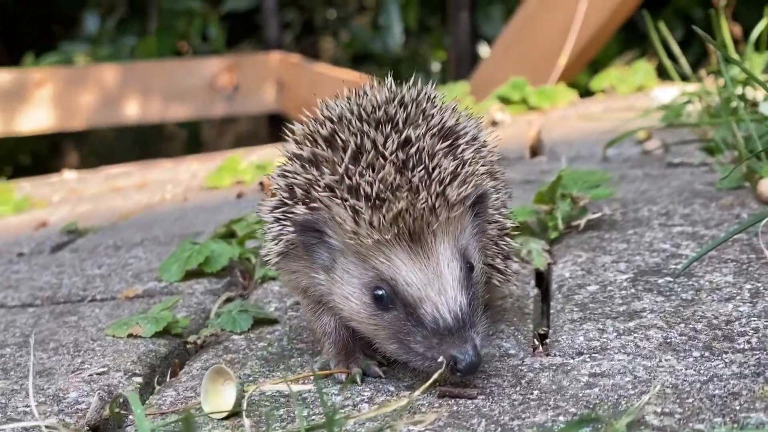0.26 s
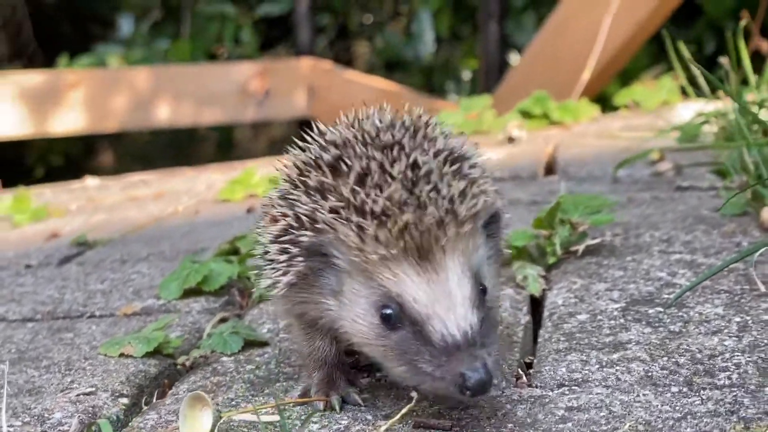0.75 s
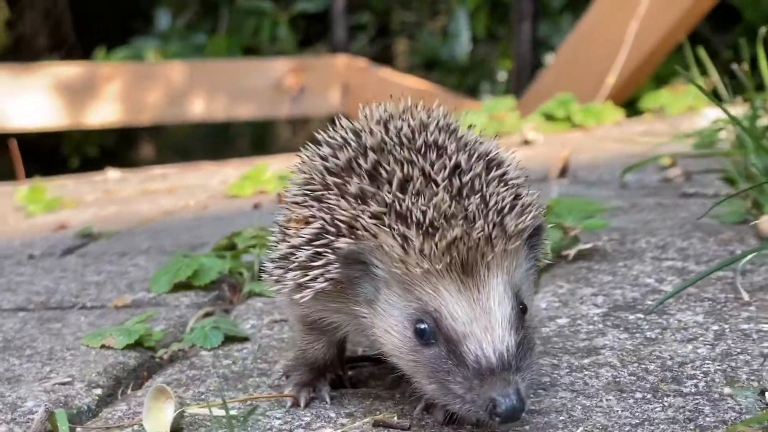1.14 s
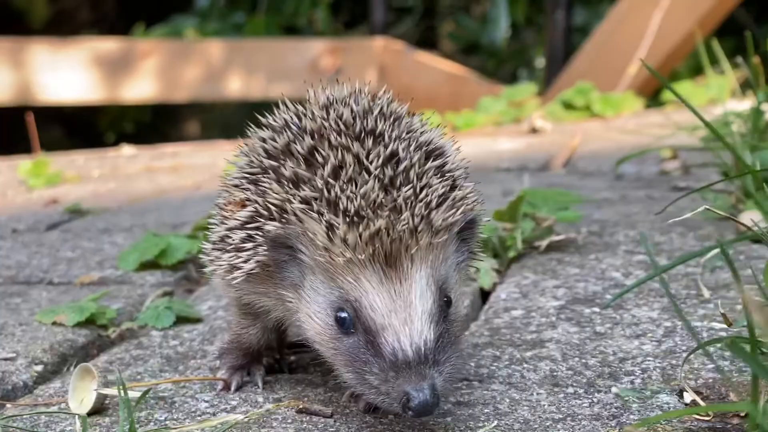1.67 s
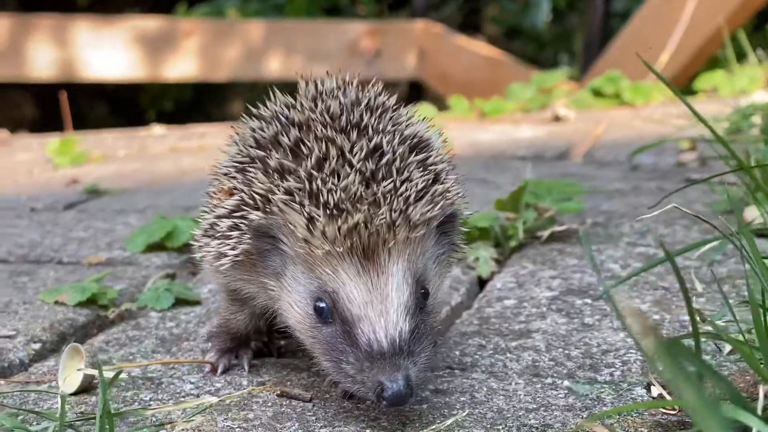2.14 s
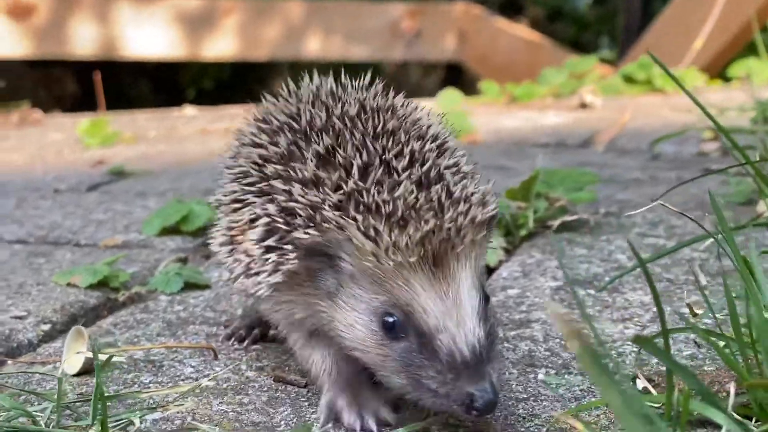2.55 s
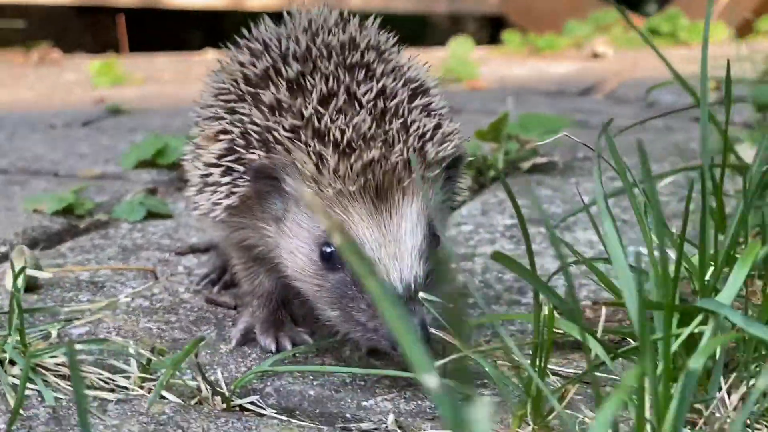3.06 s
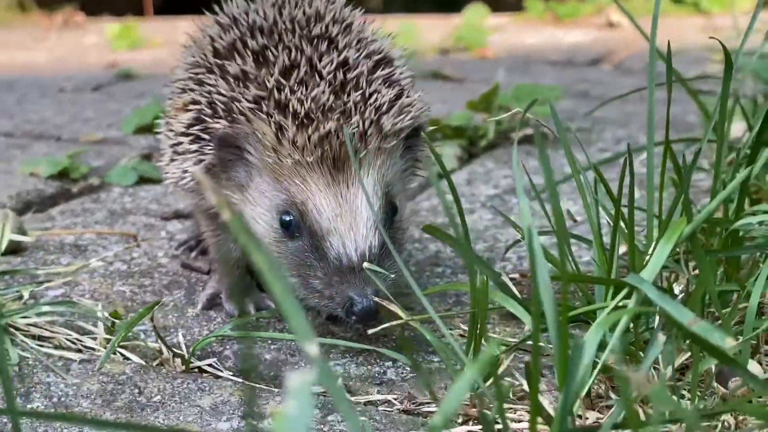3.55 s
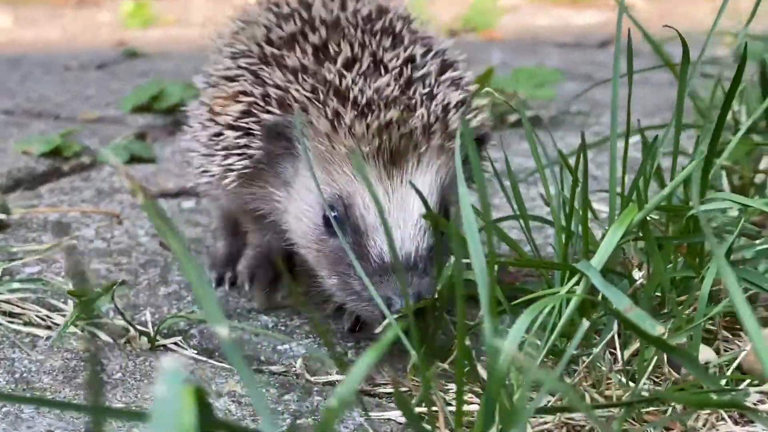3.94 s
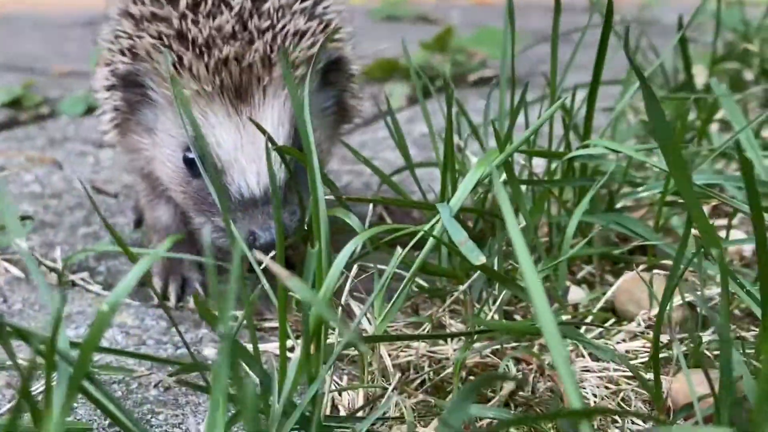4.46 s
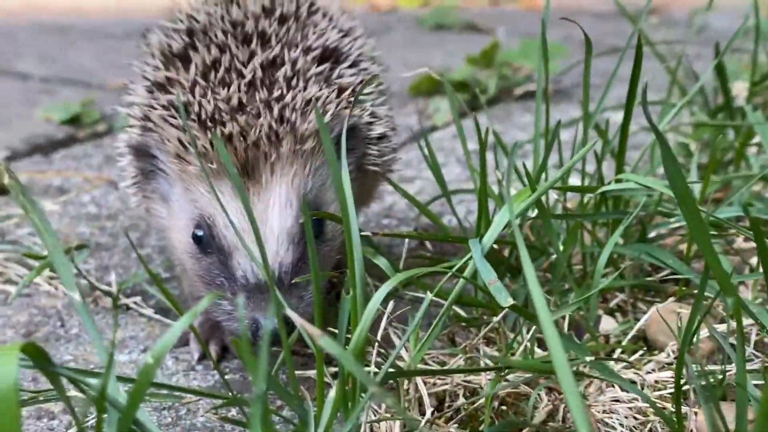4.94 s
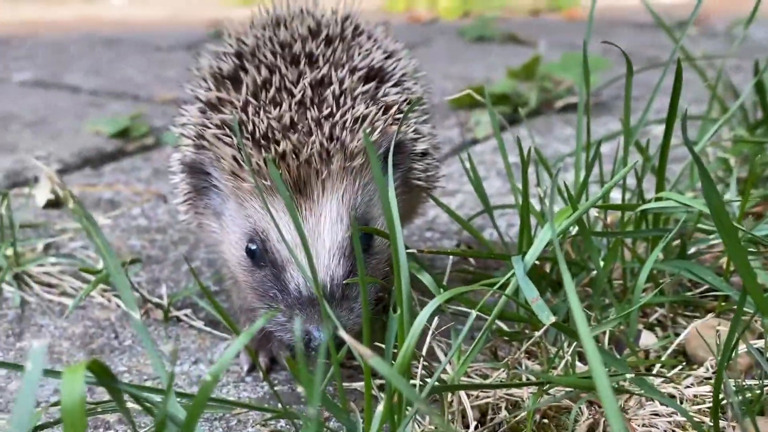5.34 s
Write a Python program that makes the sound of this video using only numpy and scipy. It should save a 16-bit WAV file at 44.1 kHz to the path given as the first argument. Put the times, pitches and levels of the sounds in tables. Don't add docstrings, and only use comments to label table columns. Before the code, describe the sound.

A hedgehog sniffs close to the microphone in quick puffs and soft draws, while a low machine drone slowly nears and dry grass ticks.

```python
import sys
import numpy as np
from scipy import signal
from scipy.fft import rfft, irfft, next_fast_len
from scipy.io import wavfile
from scipy.ndimage import uniform_filter1d, map_coordinates

SR = 44100
rng = np.random.default_rng(int(sys.argv[2]) if len(sys.argv) > 2 else 0)


def pcm_store(signal):
    levels = np.round(np.clip(np.atleast_2d(signal), -1, 1) * 32767)
    wavfile.write(sys.argv[1], SR, levels.astype(np.int16).T)


def decibels_to_gain(level_db):
    exponent = np.asarray(level_db, float) / 20
    return 10 ** exponent


N = 246958

# pitch_hz, density_db (per Hz)
RUMBLE_COLOUR = [(12, -71), (20, -41), (54, 0), (113, 1), (140, 1.5), (159, -13), (173, -24.5), (260, -17),
                 (340, -48.5), (570, -120)]
ROAR_COLOUR = [(94, -28.5), (160, -4.5), (195, -8), (242, -12.5), (301, -14.5), (383, -15), (594, -25),
               (782, -39.5), (2500, -64), (3250, -91), (5500, -120)]
HISS_COLOUR = [(700, -23), (1200, 0.5), (1900, -4), (3400, -8), (7600, -9.5), (8400, -13.5), (10500, -13),
               (12300, -16.5), (12900, -28), (15800, -31)]
SWISH_COLOUR = [(300, -43), (550, -2.5), (800, -0.5), (1100, -9.5), (2000, -31.5), (4000, -120)]
# pitch_hz, likeness (0 to 1)
LIKENESS = [(60, 1), (130, 1), (290, 0.77), (640, 0.1), (1410, 0.23), (3100, 1), (6820, 0.32),
            (15000, 0.48)]
# time_s, level_db
TRAFFIC = [(0, -2.5), (.25, 5.5), (.9, -1), (1.2, -1.5), (2.3, -0.5), (3.0, -1), (3.4, 2), (3.8, -2),
           (4.15, 5), (4.5, 1.5), (5.15, 2.5), (5.6, -2)]
# time_s, level_db
BREEZE = [
    (0, 1),
    (.6, 2),
    (1.1, 0),
    (2.2, -0.4),
    (2.7, 0.5),
    (3.4, -1),
    (4.4, -0.5),
    (5.0, -0.3),
    (5.3, 1),
    (5.6, 1),
]
# time_s, firing_db, labour_db (lifts order 2), clear_path_db (lifts what lies above)
DRONE = [(0, -59.5, 2, -6.5), (.34, -62.5, -2.5, -4.5), (.61, -55.5, 1.5, -2), (1.29, -58.5, -6, -3.5),
         (1.62, -56, 4.5, -5.5), (2.1, -55.5, 2.5, -7), (2.33, -56, -12.5, -3), (2.7, -53, 0, -2.5),
         (3.04, -49.5, 0.5, -9), (3.3, -48, 3, 1), (3.55, -49, 4, 2.5), (3.7, -49, .5, -5),
         (4.05, -47.5, .5, 1.5), (4.33, -47, 0.5, 3.5), (4.6, -46, 2.5, 10.5), (4.93, -48.5, 1, 12),
         (5.3, -51, -4, 8.5), (5.6, -47, 3, 10.5)]
# start_s, peak_db, pitch_hz, left_over_right_db
SNAPS = [(.033, -76, 11000, 0), (.074, -67.5, 12700, -17), (0.103, -65, 11500, 2), (.107, -64.5, 12500, -4),
         (.161, -78, 10000, 1), (.303, -72.5, 11300, -7), (.318, -80, 11300, -3), (.374, -79, 11000, 0),
         (.395, -87, 9000, 2), (.416, -78, 8500, 0), (.490, -80, 10800, -3), (.540, -81.5, 6600, 14),
         (1.105, -81, 7000, -2), (2.372, -72, 11000, 0), (5.46, -83, 3550, -4)]
# start_s, length_s, level_db, pitch_hz
STROKES = [(0, 0.064, -87.5, 10800), (0, 0.082, -86, 14800), (0.072, 0.045, -88, 14800),
           (0.124, 0.047, -92.5, 14300), (0.262, .06, -91.5, 15000), (0.529, 0.044, -100, 14400),
           (1.119, .04, -100, 10000), (2.335, 0.053, -97, 13900), (2.517, 0.044, -84, 1900),
           (2.69, .06, -87, 1950), (2.842, .05, -85.5, 1900), (4.06, .03, -89.5, 1230),
           (2.832, 0.023, -83.5, 14800), (2.834, 0.026, -89.5, 11000), (3.751, 0.12, -90, 14800),
           (3.775, .03, -89, 10900), (3.899, 0.033, -84, 14300), (5.138, 0.088, -103.5, 10800),
           (5.398, .05, -104, 10500), (5.319, 0.037, -93, 1790), (5.442, 0.037, -99, 1500),
           (5.502, .035, -82, 1180), (5.533, 0.062, -85, 1590)]
# start_s, peak_db, hold_s, mouth_open_db
PUFFS = [(.6399, -55, 0.021, -4), (.7844, -52, 0.023, -2), (0.9287, -54, 0.007, -1.5),
         (1.056, -57, 0.0076, -6), (1.208, -69, .0071, -18), (1.362, -71.5, .0052, -10),
         (1.723, -61, 0.0041, -4), (1.882, -64.5, 0.0072, -3), (2.068, -64.5, .0041, -9.5),
         (2.243, -69.5, .0028, -10), (2.375, -58.5, 0.014, -8), (2.5103, -60.5, 0.017, -5),
         (2.6462, -60, 0.017, 3.5), (2.776, -57.5, 0.025, 0), (2.9397, -68, 0.029, 6.5),
         (3.0932, -72, 0.0074, -16), (3.433, -70.5, 0.0048, -6), (3.7553, -58.5, 0.023, 0),
         (3.907, -55.5, 0.021, 0), (4.054, -67.5, 0.0084, 3), (4.191, -78, 0.0085, -12.5),
         (4.489, -61, 0.0096, 1), (4.621, -61.5, 0.01, 4), (4.747, -60.5, 0.0032, 6.5),
         (4.8683, -69.5, 0.01, -1)]
# start_s, first_db, last_db, nostril_flare_db
DRAWS = [(.584, -80, -62.5, -8.5), (.688, -74, -68, -13), (0.837, -65, -74, -19), (1.001, -74, -80, -26),
         (1.177, -79, -92, -14), (2.319, -86, -64, -2.5), (2.424, -73.5, -74, -14), (2.562, -70, -75, -8),
         (2.691, -73, -79.5, -10), (2.831, -68, -86, -5), (3.616, -82.5, -125, -8),
         (3.665, -71, -71.5, -10.5), (3.804, -68, -83.5, -17), (3.96, -84, -77.5, -23),
         (4.115, -79, -130, -11), (4.457, -84, -74, -26), (4.532, -85.5, -73, -10.5),
         (4.672, -72, -83.5, -17), (4.817, -75.5, -90, -17)]
# time_s, level_db
FACING = [
    (.65, -8.5),
    (1.3, -10.5),
    (1.75, -4.5),
    (2.5, -2),
    (3.0, -4),
    (3.5, -4.5),
    (4.0, -15),
    (4.9, -21.5),
]
# pitch_hz, width_hz, level_db
NOSE = [(2620, 400, -8), (3030, 500, 0), (3500, 450, -12)]
THROAT = [(470, 250, 4), (660, 320, 0.5), (930, 160, -2.5), (1180, 255, -1), (1382, 180, -4.5),
          (2140, 370, -29.5)]
NOSTRIL = [(4880, 1100, 4), (5780, 2000, 1.5), (6600, 1200, 5)]
JET = [(9750, 2900, -4.5), (12000, 1600, -6.5), (14800, 1200, -10)]
SINUS = [(3490, 1700, 1), (4550, 840, -8)]
# pitch_hz, level_db; then pitch_hz, lead_rad
PORT_LEVEL = [(60, 1), (110, -3.5), (200, 0), (380, -2.5), (700, 0), (1290, 0.5), (2380, -1), (4400, 0.5),
              (8120, -0.5), (15000, 1)]
PORT_LEAD = [(60, .2), (150, .35), (430, 1.2), (900, .4), (1550, -.2), (3270, .6), (6000, -.2), (7800, .1),
             (8400, 2.1), (10400, .2), (11600, -.2), (12600, -2.4), (15500, -4)]

FIRING_HZ = 146.7
NEAR_DB = -52
RUMBLE_DB, RUMBLE_GROWS, SWELL_DB = -55.5, 0.3, 1.2
ROAR_DB, ROAR_GROWS, ROAR_CLEARS = -60, 0.28, 0.2
HISS_DB, SWISH_DB, SWISH_GROWS = -88, -84.5, 3
SECOND_DB, THIRD_DB, THIRD_BREAKS_DB = -65.5, -73, 3
FAN_DB, FAN_GROWS, FAN_CLEARS, FADING_DB = -79, 0.89, 0.49, 2.5
FALL_T60_S, FALL_PER_HOLD = 0.067, 0.53
SHUT_S = 0.0039
DRAW_THROAT_DB, THROAT_SHADE = -4, 0.17
NOSTRIL_DB, NOSTRIL_FOLLOWS, NOSTRIL_PER_S = -9, 0.67, 96


def unit(x):
    return x / np.sqrt(np.mean(x ** 2) + 1e-20)


def along(points, hz):
    f, v = np.transpose(points)
    return np.interp(np.log(hz + 1), np.log(f + 1), v)


def curves(rows):
    s, *columns = np.transpose(rows)
    return [np.interp(np.arange(N) / SR, s, column) for column in columns]


def wobble(rate):
    knots = rng.standard_normal(int(N * rate / SR) + 4)
    return map_coordinates(knots, [np.arange(N) * rate / SR])


def filtered(x, response):
    size, lead = next_fast_len(N + SR // 2), SR // 4
    widths = [(0, 0)] * (x.ndim - 1) + [(lead, size - N - lead)]
    spectrum = rfft(np.pad(x, widths, mode="reflect"))
    return irfft(spectrum * response(np.fft.rfftfreq(size, 1 / SR)), size)[..., lead:lead + N]


def cavity(modes):
    def response(f):
        power = 0
        for centre, width, db in modes:
            damping = (f * width) ** 2
            power = power + decibels_to_gain(2 * db) * (damping / ((centre ** 2 - f * f) ** 2 + damping)) ** 2
        return np.sqrt(power / np.mean(power))
    return response


def rush(colour, patchy_db):
    grid = signal.stft(rng.standard_normal((2, N)), nperseg=512)[2]
    patches = uniform_filter1d(rng.standard_normal(grid.shape[1:]), 6, 0)
    patches = unit(uniform_filter1d(patches, 14, 1))
    pair = signal.istft(grid * decibels_to_gain(patchy_db * patches), nperseg=512)[1][:, :N]

    def mid_side(hz):
        angle = np.arccos(np.clip(along(LIKENESS, hz), -1, 1)) / 2
        return decibels_to_gain(along(colour, hz)) * [np.cos(angle), np.sin(angle)]

    mid, side = filtered(pair, mid_side)
    return unit(np.array([mid + side, mid - side]))


def town_rumble():
    near_db = curves(DRONE)[0] - NEAR_DB
    traffic_db, = curves(TRAFFIC)
    level_db = RUMBLE_DB + RUMBLE_GROWS * near_db + traffic_db + SWELL_DB * wobble(6)
    return decibels_to_gain(level_db) * rush(RUMBLE_COLOUR, patchy_db=-0.97)


def breeze():
    breeze_db, = curves(BREEZE)
    hiss = decibels_to_gain(HISS_DB + breeze_db) * rush(HISS_COLOUR, patchy_db=0.25)
    swish = decibels_to_gain(SWISH_DB + SWISH_GROWS * breeze_db) * rush(SWISH_COLOUR, patchy_db=2.5)
    return hiss + swish


def machine_roar():
    firing_db, _, clear_db = curves(DRONE)
    level_db = ROAR_DB + ROAR_GROWS * (firing_db - NEAR_DB) + ROAR_CLEARS * clear_db + 0.4 * wobble(4)
    return decibels_to_gain(level_db) * rush(ROAR_COLOUR, patchy_db=2.0)


def machine_drone():
    firing_db, labour_db, clear_db = curves(DRONE)
    near_db = firing_db - NEAR_DB
    second_db = SECOND_DB + labour_db
    third_db = THIRD_DB - 3.5 + clear_db + THIRD_BREAKS_DB * wobble(12)
    fourth_db = third_db - 17.5 + 4.1 * wobble(3)
    fan_db = FAN_DB + FAN_GROWS * near_db + FAN_CLEARS * clear_db + FADING_DB * wobble(3.5)
    # order, level_db, left-right phase spread_rad
    lines = [(1, firing_db, 0.04), (2, second_db, 0.3), (3, third_db, 0.6), (4, fourth_db, 0.6),
             (7 / 3, fan_db, 0.5)]
    turn = 2 * np.pi * FIRING_HZ * np.arange(N) / SR
    out = np.zeros((2, N))
    for order, db, spread in lines:
        drift = 0.34 * order * wobble(4)
        apart = spread * wobble(0.88) * np.array([[0.5], [-0.5]])
        level = np.sqrt(2) * decibels_to_gain(db + 0.23 * order * wobble(9))
        out += level * np.sin(order * turn + drift + apart)
    misfire = unit(filtered(rng.standard_normal(N), cavity([(FIRING_HZ / 2, 22, 0)])))
    return out + decibels_to_gain(-48 + 0.19 * firing_db) * misfire


def grass():
    out, t = np.zeros((2, N + SR)), np.arange(SR // 125) / SR
    snaps = [(s, db + 18.5, hz, pan_db, 9) for s, db, hz, pan_db in SNAPS]
    for s, length, db, hz in STROKES:
        when, size, pitch, side = rng.random((4, 120))
        times = s + length * when
        levels_db = db + 6.5 - 4.0 * np.log(size + 0.02)
        pitches = hz + 1200 * (pitch - 0.5)
        ring_cycles = np.full(120, 7 + hz / 450)
        snaps += zip(times, levels_db, pitches, 12 * side - 6, ring_cycles)
    for s, db, hz, pan_db, cycles in snaps:
        phase = 0.64 * rng.uniform(0, 2 * np.pi, (2, 1))
        envelope = (1 - np.exp(-t * hz)) * decibels_to_gain(-60 * t * hz / cycles)
        snap = envelope * np.sin(2 * np.pi * hz * t + phase)
        pan = decibels_to_gain([[pan_db / 2], [-pan_db / 2]])
        out[:, round(s * SR):][:, :len(t)] += decibels_to_gain(db) * pan * snap
    return out[:, :N]


def puff(t, db, hold, open_db):
    t60 = FALL_T60_S + FALL_PER_HOLD * hold
    fall_db = -90 * np.minimum(t, hold) - 60 * np.clip(t - hold, 0, None) / t60
    shape = (1 - np.exp(-t / 0.0013)) ** 2 * decibels_to_gain(fall_db)
    nostril_db = NOSTRIL_DB + NOSTRIL_FOLLOWS * open_db + NOSTRIL_PER_S * hold
    jet_db = nostril_db - 8.0
    balance = decibels_to_gain([[0], [open_db + 3.5], [nostril_db], [jet_db]])
    return decibels_to_gain(db - 6.0) * balance * shape ** np.array([[1], [0.8], [1.05], [1.15]])


def draw(t, length, first_db, last_db, flare_db, throat_db):
    edges = np.clip(t / 0.016, 0, 1) * np.clip((length - t) / 0.011, 0, 1)
    level = decibels_to_gain(first_db + (last_db - first_db) * np.clip(t / length, 0, 1))
    return level * edges * decibels_to_gain([[0], [throat_db], [flare_db], [flare_db - 17.0]])


def airflow():
    flow, t = np.zeros((4, N + SR)), np.arange(SR // 4) / SR
    facing_db, = curves(FACING)
    starts = np.transpose(PUFFS)[0]
    for s, db, hold, open_db in PUFFS:
        flow[:, round((s - 0.002) * SR):][:, :len(t)] += puff(t, db, hold, open_db)
    for s, first_db, last_db, flare_db in DRAWS:
        length = starts[starts > s].min() - s - SHUT_S
        throat_db = DRAW_THROAT_DB + THROAT_SHADE * facing_db[round(s * SR)]
        breath = draw(t, length, first_db, last_db, flare_db, throat_db)
        flow[:, round(s * SR):][:, :len(t)] += breath
    flow = flow[:, :N]
    return np.vstack([flow, flow[0] * decibels_to_gain(facing_db)])


def stone_echo(nose):
    t = np.arange(SR // 8) / SR
    scatter = rng.standard_normal((2, len(t))) * decibels_to_gain(-60 * t / 0.15)
    scatter = scatter / np.linalg.norm(scatter[0])
    return signal.fftconvolve(nose[None], scatter, axes=1)[:, :N]


def sniffing():
    flutter_db = 1.1 * wobble(220) + 2.27 * np.array([wobble(180) for _ in range(5)])
    turbulence = airflow() * unit(decibels_to_gain(flutter_db) * rng.standard_normal((5, N)))
    cavities = (NOSE, THROAT, NOSTRIL, JET, SINUS)
    nose = sum(filtered(air, cavity(modes)) for air, modes in zip(turbulence, cavities))
    return nose + decibels_to_gain(-13.0) * stone_echo(nose)


def scene():
    far = town_rumble() + breeze() + machine_roar() + machine_drone()
    return far + grass() + sniffing()


def top_cut(x):
    return signal.sosfilt(signal.butter(12, 15920, fs=SR, output="sos"), x)


def record(dry):
    half = np.array([[0.5], [-0.5]])

    def ports(hz):
        return decibels_to_gain(half * along(PORT_LEVEL, hz)) * np.exp(1j * half * along(PORT_LEAD, hz))

    mix = filtered(dry, ports)
    return top_cut(mix)


dry = scene()
out = record(dry)
pcm_store(out)
```